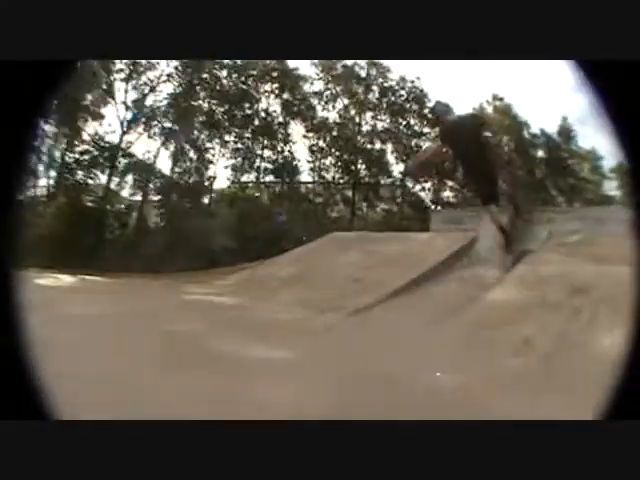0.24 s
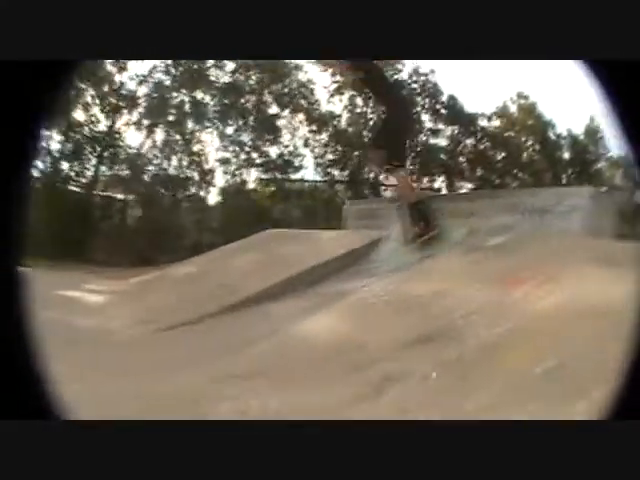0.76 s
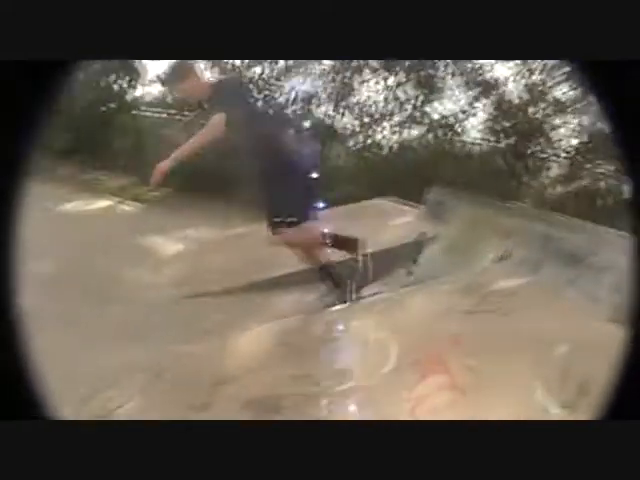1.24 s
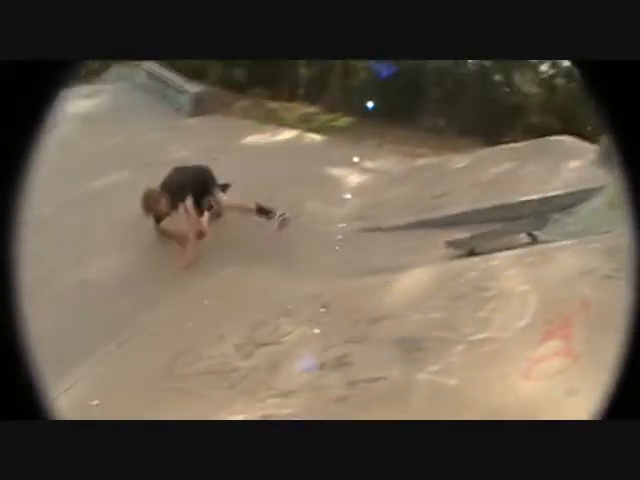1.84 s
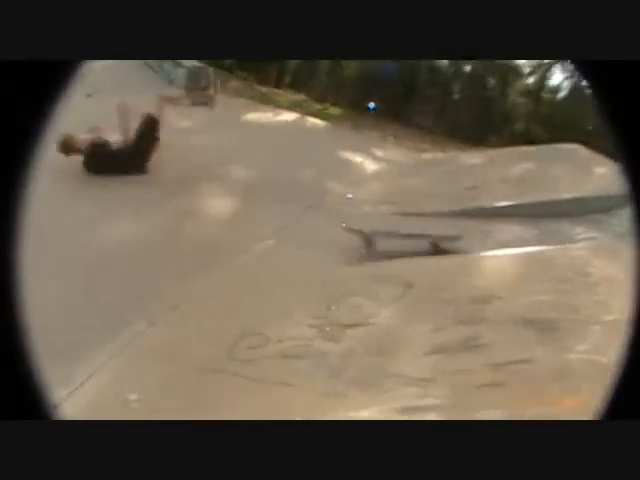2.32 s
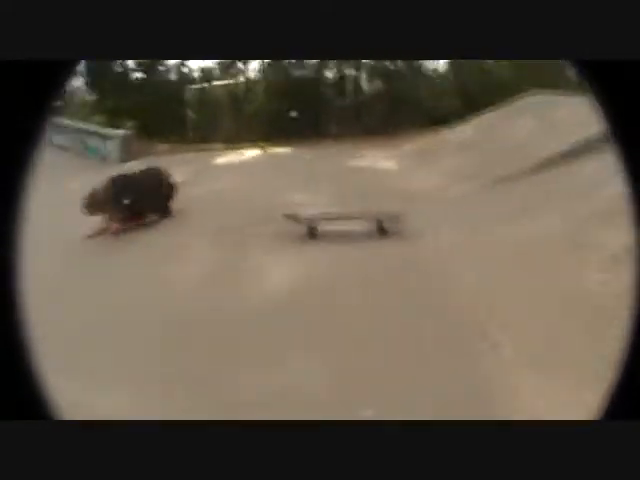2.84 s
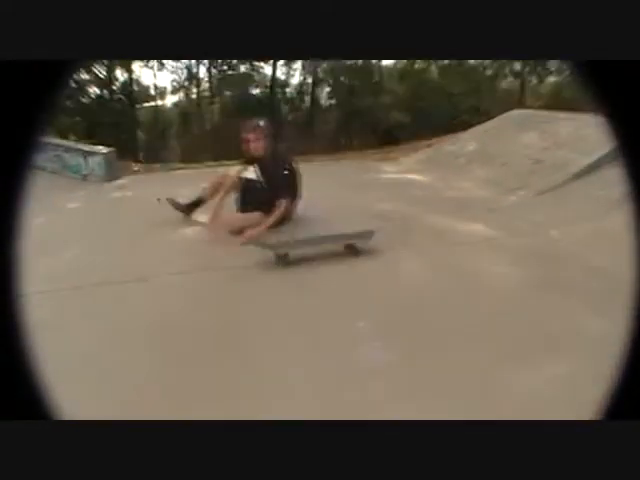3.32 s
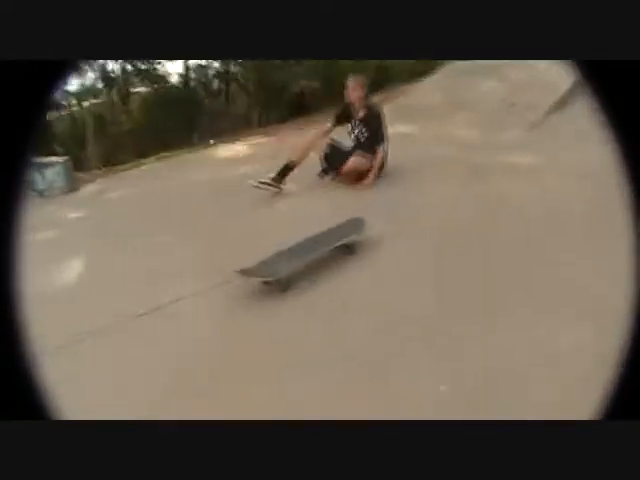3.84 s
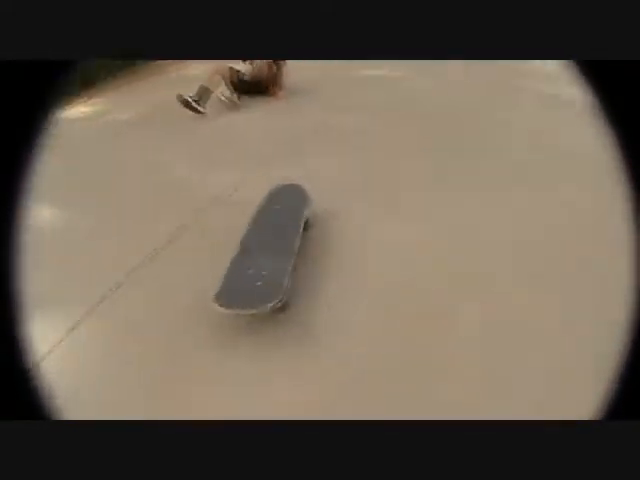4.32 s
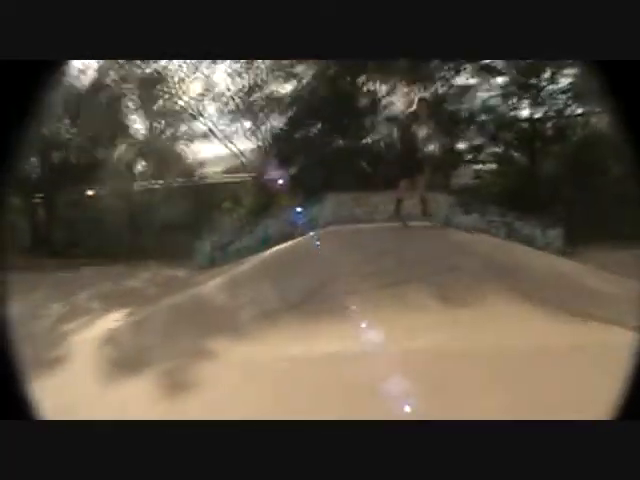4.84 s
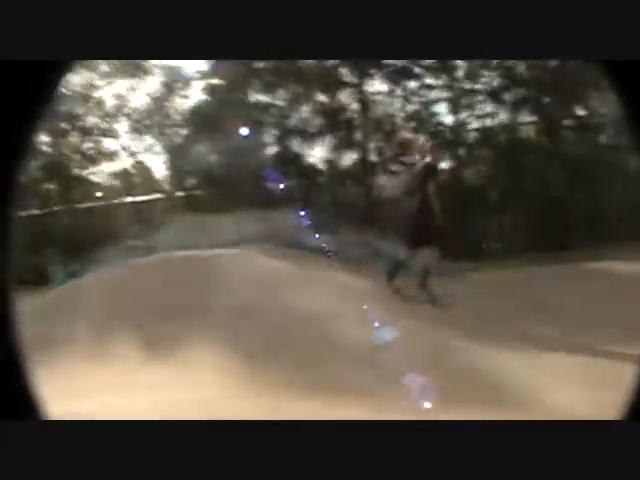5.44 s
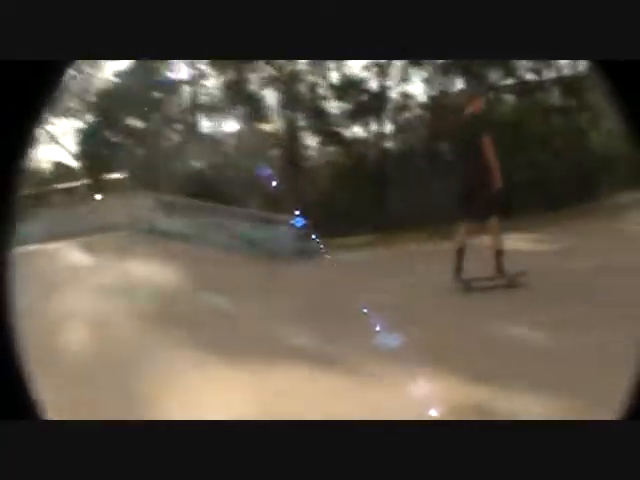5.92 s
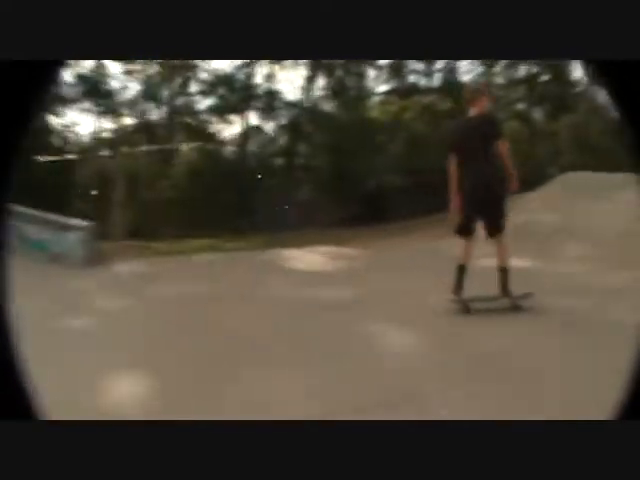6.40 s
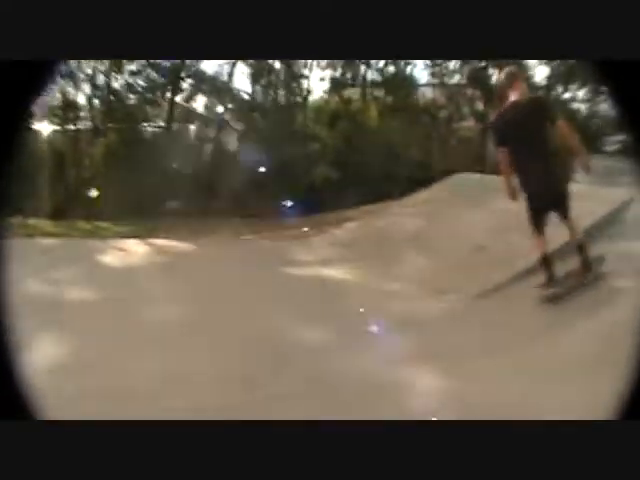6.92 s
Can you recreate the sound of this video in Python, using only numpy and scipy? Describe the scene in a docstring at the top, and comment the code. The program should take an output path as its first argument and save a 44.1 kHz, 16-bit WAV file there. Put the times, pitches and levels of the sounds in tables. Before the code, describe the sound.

A skateboard rolls up a concrete bank, pops and clatters in a bail, rolls close, and after a brief silence rides past again.

```python
"""Skateboard on a concrete bank

Heard from a moving stereo microphone close by, a skater rides up a bank, pops the board and bails.
It clatters down, lands on its wheels and rolls right up, empty. After a silent gap he rides past again,
over a slab joint. Rough concrete shakes the deck through the wheels and grit cracks under them.
Wind buffets the microphone, and its fast gain control ducks after every hard knock."""
import sys
import numpy as np
from scipy import signal
from scipy.fft import rfft, irfft
from scipy.io import wavfile
from scipy.ndimage import uniform_filter1d, map_coordinates

SR = 44100
rng = np.random.default_rng(int(sys.argv[2]) if len(sys.argv) > 2 else 0)


def materialize(psi):
    """Save the field psi as 16-bit PCM at rate SR to the path in sys.argv[1].

    A 1-D psi becomes a single channel; in a 2-D psi each row is a channel.
    """
    bounded = np.clip(np.atleast_2d(psi).T, -1, 1)
    quanta = np.round(bounded * 32767).astype(np.int16)
    wavfile.write(sys.argv[1], SR, quanta)


N = 315756
TIME = np.arange(N) / SR
AGE = TIME[TIME < .16]   # seconds since a blow
GAP_START_S, GAP_END_S = 4.652, 5.480


def from_db(db):
    """Decibels as an amplitude factor."""
    return np.exp(np.asarray(db) * np.log(10) / 20)


def rms_one(x):
    """Scale a steady sound to rms 1."""
    return x / np.sqrt(np.mean(x ** 2) + 1e-20)


def burst_one(x):
    """Scale a blow to the energy of a fiftieth of a second at rms 1."""
    return x / np.sqrt(np.sum(x ** 2, axis=-1, keepdims=True) * 50 / SR + 1e-20)


def in_time(rows):
    """Join (seconds, value) points into a curve."""
    return np.interp(TIME, *np.transpose(rows))


def between(from_s, to_s, edge_s):
    """1 inside a span of time, 0 outside, with soft edges."""
    return (np.tanh((TIME - from_s) / edge_s) - np.tanh((TIME - to_s) / edge_s)) / 2


def drift(hz):
    """A smooth random wander of spread 1."""
    step, settle = 40, 2000
    pole = np.exp(-2 * np.pi * step * hz / SR)
    noise = rng.standard_normal(N // step + settle + 2)
    slow = signal.lfilter([1], [1, -2 * pole, pole * pole], noise)[settle:]
    return np.interp(np.arange(N) / step, np.arange(len(slow)), rms_one(slow))


def colour(x, points, size=2048):
    """Causal (minimum-phase) filter that follows a (Hz, dB) table."""
    hz, db = np.transpose(points)
    grid = np.maximum(np.fft.rfftfreq(size, 1 / SR), 1)
    gain = from_db(np.interp(np.log(grid), np.log(hz), db))
    cepstrum = irfft(np.log(gain))
    cepstrum[1:size // 2] *= 2
    cepstrum[size // 2 + 1:] = 0
    impulse = irfft(np.exp(rfft(cepstrum)))
    return signal.oaconvolve(x, impulse[None], axes=-1)[:, :x.shape[-1]]


def resonate(x, hz, width_hz):
    """A resonance with gain 1 at its peak."""
    r = np.exp(-np.pi * width_hz / SR)
    feedback = [1, -2 * r * np.cos(2 * np.pi * hz / SR), r * r]
    return signal.lfilter(np.array([1, 0, -1]) * (1 - r * r) / 2, feedback, x)


def cut(x, hz, kind, order=2):
    """Butterworth high-pass or low-pass."""
    return signal.sosfilt(signal.butter(order, hz, kind, fs=SR, output="sos"), x)


def bend(x, percent):
    """Raise or lower the pitch of a steady sound from moment to moment."""
    position = np.cumsum(1 + percent / 100) % (N - 1)
    return np.array([map_coordinates(channel, [position], order=1) for channel in x])


def add(out, start_s, sound):
    """Mix a sound in from its start time."""
    at = max(round(start_s * SR), 0)
    out[:, at:at + sound.shape[-1]] += sound[..., :N - at]


def grain_kicks(per_s, spread_db):
    """Rolling over tiny bumps gives dense random kicks of uneven size."""
    met = rng.random((2, N)) < per_s / SR
    sizes = 1 + (from_db(spread_db) - 1) * rng.standard_exponential((2, N), dtype=np.float32)
    return met * sizes * rng.standard_normal((2, N), dtype=np.float32)


# The deck's drone over changing ground. Each row: time in seconds, pitch shift in per cent.
DECK_BEND = [(1.9, 0), (2.1, -2), (2.34, 2.5), (2.47, 2), (2.72, -7), (2.95, -1), (4.6, 1), (5.5, 0.5),
             (7.1, 0)]
def deck_rumble(modes, load_db):
    """Concrete shakes the deck; each resonance waxes and wanes as the load shifts between wheels."""
    kicks = grain_kicks(2500, spread_db=-0.5) * from_db(load_db)
    rumble = sum((-1) ** k * from_db(db + 1.2 * drift(hz=11)) * resonate(kicks, hz, width)
                 for k, (hz, width, db) in enumerate(modes))
    rumble = bend(rumble, percent=in_time(DECK_BEND) + 1.5 * drift(hz=4))
    return rms_one(cut(cut(rumble, 147.6, "high"), 1010, "low"))


def wheel_growl():
    """The wheel bodies answer the concrete with a low growl."""
    body = resonate(grain_kicks(4000, spread_db=-0.5), hz=238, width_hz=150)
    return rms_one(cut(cut(body, 180, "high", order=3), 520, "low"))


# Spectrum of the wheels' hiss. Each row: frequency in Hz, level in dB.
HISS = [(2350, -21), (4000, 0.5), (4930, -2), (8160, -1), (9380, -1.5), (12500, -11.5), (15100, -23),
        (16000, -18)]
# The bearings' steel rings. Each row: frequency in Hz, width in Hz, gain in dB relative to the hiss.
BEARING_RINGS = [(4900, 200, -8), (6100, 220, -9), (7400, 250, -5), (8400, 220, -7), (9500, 250, -6)]
def steely_hiss(kicks):
    """Fine kicks make a hiss; bearing resonances fade in and out of it as the balls shift."""
    hiss = colour(kicks, HISS)
    rings = sum(from_db(db + 5 * np.tanh(drift(hz=2.5))) * resonate(hiss, hz, width)
                for hz, width, db in BEARING_RINGS)
    return rms_one(hiss + rings)


# Wheel speed. Each row: time in seconds, turns per second.
WHEEL_TURNS = [(0, 30), (1, 22), (2.3, 30), (3.3, 21), (4.6, 19), (5.5, 30), (7.2, 27)]
def rolling(levels, deck_modes, rasp_spectrum, rumble_db, rumble_follows, hiss_db, hiss_follows,
            lumpy_db, growl_db):
    """Wheels rasp on concrete, with rumble, growl and hiss following; uneven wear throbs once a turn."""
    rasp_db = in_time(levels)
    effort_db = rasp_db + 25   # above an ordinary roll
    turns_per_s = in_time(WHEEL_TURNS) * (1 + 0.09 * drift(hz=4.2))
    throb = np.cos(2 * np.pi * np.cumsum(turns_per_s) / SR)
    load_db = lumpy_db * (0.27 * throb + 0.21 * drift(hz=35))
    rumble = deck_rumble(deck_modes, load_db)
    growl = from_db(growl_db) * wheel_growl()
    rasp = rms_one(colour(grain_kicks(9000, spread_db=-0.5) * from_db(0.68 * load_db), rasp_spectrum))
    hiss = steely_hiss(grain_kicks(25000, spread_db=3.5) * from_db(0.27 * load_db + drift(hz=60)))
    sound = (from_db(rumble_db + rumble_follows * effort_db) * rumble
             + from_db(rasp_db) * (rasp + growl)
             + from_db(hiss_db + hiss_follows * effort_db) * hiss)
    return sound * ((TIME >= levels[0][0]) & (TIME < levels[-1][0]))


# Wheel rasp at the microphone on each stretch. Each row: time in seconds, level in dB.
APPROACH_LEVELS = [(0, -18.5), (.29, -20), (.39, -23), (.56, -20.5)]
BANK_LEVELS = [(.57, -40.5), (.7, -25), (.83, -21), (.96, -15.5), (1.07, -31), (1.42, -33), (1.7, -42)]
EMPTY_LEVELS = [(1.86, -57), (1.96, -38.5), (2.05, -32), (2.3, -27), (2.55, -24.5), (2.71, -26),
                (2.76, -26), (2.84, -18), (2.97, -28), (3.18, -29), (3.3, -24.5), (4.12, -22), (4.29, -21),
                (4.52, -14), (4.66, -22)]
RIDE_BY_LEVELS = [(5.47, -25), (5.62, -23.5), (5.76, -26), (6.0, -29), (6.12, -31.5), (6.27, -34),
                  (6.57, -25.5), (6.9, -21.5), (7.17, -26)]
# Resonances of the rolling deck. Each row: frequency in Hz, width in Hz, gain in dB.
DECK_RUN_UP = [(148.3, 110, -17), (248.5, 91, -12), (413, 40, 2), (493, 58, 2.5), (610, 120, 1),
               (745, 200, -8.5)]
DECK_EMPTY = [(336, 83, -7), (481, 100, -1.5), (557, 47, 3), (627, 54, 3.5), (703, 76, -3)]
DECK_RIDE_BY = [(248, 170, -14), (419, 72, -3.5), (494, 62, 0.5), (570.4, 70, 1), (651, 88, -1)]
# Spectra of the rasp. Each row: frequency in Hz, level in dB.
RASP_RUN_UP = [(440, -29), (750, 1.5), (827, 4.5), (961, 0.5), (1360, 1.5), (1540, -3.5), (2030, -10),
               (2620, -7), (3280, -10), (3900, -17), (4500, -23), (5850, -52), (9900, -120)]
RASP_EMPTY = [(440, -36.5), (750, -3), (814, -0.5), (925, -6), (1040, 1), (1250, 0), (1350, -2.5),
              (1480, 0), (1640, -5), (2090, -8.5), (2290, -9), (2960, -10), (3380, -11), (3900, -16.5),
              (4500, -27.5), (5850, -64), (9900, -120)]
RASP_RIDE_BY = [(500, -36), (850, -6), (905, -9), (1010, -1.5), (1360, -2), (1590, -9), (1770, -7),
                (2090, -14), (2520, -6.5), (2820, -13.5), (3400, -13), (3810, -20), (4500, -20.5),
                (5850, -22.5), (9900, -120)]
def wheels():
    """The board rolls to the bank, up it, back empty towards the microphone, then past with its rider."""
    approach = rolling(APPROACH_LEVELS, DECK_RUN_UP, RASP_RUN_UP, rumble_db=-25, rumble_follows=0.48,
                       hiss_db=-42.5, hiss_follows=1.7, lumpy_db=-5, growl_db=-15.5)
    bank = rolling(BANK_LEVELS, DECK_RUN_UP, RASP_RUN_UP, rumble_db=-21.5, rumble_follows=1,
                   hiss_db=-35.5, hiss_follows=.9, lumpy_db=4, growl_db=-14.5)
    coarse = between(2.09, 2.78, edge_s=0.07)   # a coarser slab shakes the empty board harder
    empty = rolling(EMPTY_LEVELS, DECK_EMPTY, RASP_EMPTY, rumble_db=9 * coarse - 26, rumble_follows=0.77,
                    hiss_db=-33.5, hiss_follows=0.66,
                    lumpy_db=2.5 * coarse - 0.5, growl_db=7 * coarse - 13.5)
    ride_by = rolling(RIDE_BY_LEVELS, DECK_RIDE_BY, RASP_RIDE_BY,
                      rumble_db=in_time([(5.9, -22), (6.6, -19.5)]), rumble_follows=0.51,
                      hiss_db=-34, hiss_follows=1.06, lumpy_db=2, growl_db=-21.5)
    return approach + bank + empty + ride_by


# Gusts right on the microphone as it is swung along. Each row: peak time in seconds,
# half length in seconds, buffeting in dB, flutter in dB relative to the buffeting.
GUSTS = [(.14, 0.27, -31.5, 0.5), (.52, 0.044, -31.5, 13), (.74, 0.15, -31, 7.5), (0.912, 0.09, -24, 7),
         (1.835, 0.034, -31.5, -2), (2.527, 0.43, -30.5, -5), (3.549, 0.428, -27, -8.5),
         (5.83, 0.31, -24, 5), (6.606, 0.11, -39, -5)]
# Spectra of the low buffeting and the brighter flutter. Each row: frequency in Hz, level in dB.
BUFFET = [(20, -29.5), (50, -10), (100, 1), (170, 9.5), (280, 7), (420, -9.5), (800, -38), (2000, -68)]
FLUTTER = [(150, -25), (330, 7.5), (480, 4.5), (800, -1.5), (1300, -14), (2200, -21), (4000, -47.5)]
def wind():
    """Gusts swell and die away as lumpy turbulence, mostly opposite at the two microphone ports."""
    calm_buffet_db, calm_flutter_db = -50.5, -51
    peak_s, half_s, gust_db, flutter_db = np.transpose(GUSTS)[:, :, None]
    swells = from_db(gust_db) * np.exp(-((TIME - peak_s) / half_s) ** 2)
    buffet_gain = from_db(calm_buffet_db) + swells.sum(axis=0)
    flutter_gain = from_db(calm_flutter_db) + (from_db(flutter_db) * swells).sum(axis=0)
    eddies_db = 1.1 * drift(hz=22)
    buffet = rms_one(colour(rng.standard_normal((2, N)) * from_db(eddies_db), BUFFET))
    fast_eddies = rng.standard_normal((2, N)) * from_db(0.35 * eddies_db + 1.2 * drift(hz=50))
    flutter = rms_one(colour(fast_eddies, FLUTTER))
    common, opposite = buffet_gain * buffet + flutter_gain * flutter
    return from_db(-11.5) * common + opposite * [[1], [-1]]


def crunch(decay_s, tail_db, tail_s, bite_s=0.00225):
    """Contact noise: a burst that builds as the surfaces bite, and a weak scattered tail."""
    bite = 1 - np.exp(-AGE / bite_s)
    decay = np.exp(-AGE / decay_s) + from_db(tail_db) * np.exp(-AGE / tail_s)
    return rng.standard_normal((2, len(AGE))) * bite * decay


def dying_tone(hz, decay_s):
    """One struck resonance that swells in about a millisecond and dies."""
    tone = np.sin(2 * np.pi * (hz * AGE + rng.random((2, 1))))
    return burst_one(tone * (1 - np.exp(-AGE / .001)) * np.exp(-AGE / decay_s))


# The board striking concrete; its pitch depends on the spot that hits. Two rows are the skater's shoes instead:
# a faint scuff at 1.508 s and the slap of a foot at 1.52 s. # Each row: start in seconds, deck level in dB,
# trucks level in dB, deck pitch in Hz, trucks pitch in Hz, # low-pass in Hz, first hard tick in dB relative to
# the trucks.
CLACKS = [(0.3228, -16.5, -19, 1040, 1375, 10920, -13), (0.5541, -27.5, -13.5, 790, 1630, 10500, -3),
          (1.4309, -20.5, -12.5, 490, 1670, 6900, -7.5), (1.508, -33, -35.5, 810, 2100, 7000, -11.5),
          (1.52, -13, -7.5, 470, 1114, 5500, -13.5), (1.608, -25, -18.5, 920, 1680, 5970, -14),
          (1.673, -28.5, -38, 890, 1610, 8000, -11), (1.6844, -35.5, -25, 854, 1540, 9000, -8.5),
          (1.702, -32, -30, 537, 1640, 10000, -4.5), (1.7165, -48.5, -25, 545, 1970, 9040, -10),
          (1.753, -35, -38, 780, 1570, 10000, -2), (1.8345, -15.5, -20.5, 789, 1180, 12900, -12.5),
          (1.863, -34.5, -27, 805, 1780, 10000, -11), (1.961, -29, -42, 756, 1510, 9050, -11),
          (2.011, -25.5, -20.5, 810, 1570, 11150, -8), (2.0183, -18.5, -30.5, 756, 1870, 6250, -13)]
# Modes of the struck board. Each row: frequency in Hz, level in dB, seconds to fall 60 dB.
BOARD_MODES = [(587, -4.5, .035), (770, -0.5, 0.037), (843, -16, 0.06), (1154, -1.5, 0.065), (1590, 3, .03),
               (1950, -5, 0.038), (2130, -1.5, 0.034), (2600, -14.5, 0.078), (2740, -1, .03),
               (3450, -12, 0.029), (4190, -11, .05)]
# Spectra of a woody slap and a bright snap. Each row: frequency in Hz, level in dB.
SLAP = [(150, -27), (500, -11.5), (1000, 12.5), (1700, 1), (3200, -5.5), (5000, -11), (9000, -22)]
SNAP = [(800, -10), (2500, 5), (4500, 0), (7000, 1), (9500, -0.5), (12000, -7.5), (16000, -25.5)]
def clacks():
    """The wooden deck knocks, snaps and rings low; the metal trucks tick, slap, clank and ring high."""
    out = np.zeros((2, N))
    hz, mode_db, t60 = np.transpose(BOARD_MODES)[:, :, None]
    for start_s, deck_db, truck_db, deck_hz, truck_hz, top_hz, tick_db in CLACKS:
        strike_point_db = rng.normal(0, 2.5, hz.shape)
        drive_db = np.interp(hz, [850, 1400], [deck_db, truck_db - 6.5])
        modes = np.sin(2 * np.pi * (hz * AGE + rng.random((2, len(hz), 1))))
        ring = np.sum(from_db(mode_db + strike_point_db + drive_db - 60 * AGE / t60) * modes, axis=1)
        slap = burst_one(colour(crunch(.0078, tail_db=-28, tail_s=.014), SLAP))
        snap = burst_one(colour(crunch(.003, tail_db=-14, tail_s=.014), SNAP))
        tick = burst_one(colour(crunch(.0007, tail_db=-40, tail_s=.004, bite_s=.0001), SNAP))
        knock = dying_tone(deck_hz, decay_s=.0068)
        clank = dying_tone(truck_hz, decay_s=.003)
        deck = from_db(-2) * knock + from_db(-3) * snap
        trucks = from_db(-8.5) * clank + from_db(-12.5) * slap + from_db(tick_db) * tick
        blow = ring + from_db(deck_db) * deck + from_db(truck_db) * trucks
        add(out, start_s, cut(cut(blow, 298.4, "high"), top_hz, "low"))
    return out


def thump(hz, ring_s, flex_db, click_db):
    """Soft urethane meets an edge: a knock of a few cycles, a lower flex of the deck, a woody click."""
    envelope = (1 - np.exp(-AGE / .0006)) * np.exp(-(AGE / ring_s) ** 2)
    knock = sum(from_db(db) * np.sin(2 * np.pi * (hz * ratio * AGE + rng.random((2, 1))))
                for ratio, db in [(.6, flex_db), (1, 1.5), (1.5, -7.5), (2, -11)])
    click = burst_one(colour(crunch(.003, tail_db=-19.5, tail_s=.012, bite_s=.0005), SLAP))
    return cut(envelope * knock, 260, "high", order=4) + from_db(click_db) * cut(click, 7000, "low")


# Axles crossing edges and slab joints, the front about 0.1 s before the rear. Each row: start in
# seconds, level in dB, pitch in Hz, ring in seconds, second wheel's lag in seconds, then the
# relative levels in dB of the second wheel, the deck's flex and the click.
JOINTS = [(0.7507, -3, 564, 0.0059, 0.0035, -10, -14, -14),
          (0.8364, 3.5, 686, 0.0086, 0.0039, -21, -19, -16), (.944, -6, 437, .007, .004, -12, -11, -22),
          (1.087, -8.5, 550, .007, 0.0037, -12, -16, -11.5),
          (2.478, -4.5, 592, 0.0066, 0.002, -14.5, -6, -18),
          (2.7248, -4.5, 527, 0.01, .003, -17, -10.5, -14.5),
          (2.8118, 0.5, 596, 0.0098, 0.0026, -20, -7, -14), (4.5, -6.5, 456, 0.0069, .003, -8.5, -4.5, -10),
          (4.616, -7, 482, 0.0068, 0.0029, -11.5, -7, -11.5),
          (6.072, -7.5, 520, 0.0075, 0.0074, 1, -13.5, -22),
          (6.1709, -11.5, 525, 0.0061, 0.0066, 2, -6, -25), (6.805, -11, 800, .009, .003, -16, -15, -24),
          (6.897, -10, 574, 0.0084, 0.0039, -12, -14, -30)]
# Pits in the concrete. Each row: start in seconds, level in dB, pitch in Hz.
PITS = [(1.331, -24, 640), (2.258, -16, 595), (2.335, -11.5, 570), (2.403, -19.5, 630), (2.436, -13, 659),
        (2.538, -9, 593), (7.14, -15.5, 538)]
def joints_and_pits():
    """Each axle meets a joint with one wheel just ahead of the other; pits jolt one wheel alone."""
    out = np.zeros((2, N))
    for start_s, db, hz, ring_s, lag_s, second_db, flex_db, click_db in JOINTS:
        add(out, start_s, from_db(db) * thump(hz, ring_s, flex_db, click_db))
        add(out, start_s + lag_s, from_db(db + second_db) * thump(hz, ring_s, flex_db, click_db))
    for start_s, db, hz in PITS:
        add(out, start_s, from_db(db) * thump(hz, ring_s=.0075, flex_db=-7.5, click_db=-22.5))
    return out


# Loose grit on the concrete. Each row: start in seconds, level in dB, pitch of the snap in Hz,
# decay in seconds, jolt of the deck in dB relative to the snap.
GRIT_CRACKS = [(.775, -27.5, 8500, 0.003, 7.5), (1.044, -23, 6100, 0.0046, -2),
               (1.071, -34, 6000, 0.0047, 1), (2.0959, -32, 6500, 0.0059, -3),
               (2.357, -32.5, 4000, 0.0043, 9), (2.378, -30.5, 6000, 0.0043, 0.5),
               (2.5107, -31.5, 6500, .002, -2), (2.577, -23, 6600, 0.013, 4),
               (3.131, -29, 10570, 0.0021, -2.5), (5.621, -25.5, 5400, 0.0029, 1),
               (5.692, -33, 5360, .004, 3.5), (5.813, -43, 4800, 0.0046, 14),
               (6.8048, -26, 5400, 0.0061, 0)]
def grit_cracks():
    """A grain of grit is crushed or spat out from under a wheel, and gives the deck a small jolt."""
    out = np.zeros((2, N))
    for start_s, db, hz, decay_s, jolt_db in GRIT_CRACKS:
        burst = crunch(decay_s, tail_db=-20, tail_s=.01, bite_s=.0002)
        snap = burst_one(resonate(colour(burst, SNAP), hz, width_hz=3400))
        jolt = burst_one(resonate(burst, hz=1500, width_hz=1400))
        add(out, start_s, from_db(db) * (snap + from_db(jolt_db) * jolt))
    return out


def free_spin():
    """While the board tumbles, its wheels only hiss and whirr in their bearings."""
    hiss = steely_hiss(grain_kicks(18000, spread_db=17))
    whirr = rms_one(colour(grain_kicks(5500, spread_db=18), RASP_EMPTY))
    return between(1.47, 1.926, edge_s=.075) * (from_db(-40.5) * hiss + from_db(-42.5) * whirr)


# Dull low pushes: the skater coming down on the concrete, then a faint one as a gust pops on the microphone.
# Each row: start in seconds, level in dB.
LOW_PUSHES = [(1.521, -13), (1.812, -35)]
def low_pushes():
    """A dull, low push: shoes and body landing, or a gust popping on the microphone."""
    out = np.zeros((2, N))
    tones = sum(from_db(db) * np.sin(2 * np.pi * hz * AGE) for hz, db in [(240, 8.7), (440, 0.5)])
    envelope = (1 - np.exp(-AGE / .0022)) * np.exp(-AGE / .0054)
    push = cut(tones * envelope, 134, "high") * from_db([[0], [-3]])   # weaker in the side channel
    for start_s, db in LOW_PUSHES:
        add(out, start_s, from_db(db) * push)
    return out


# Wheel resonances that stand out at close range. Each row: frequency in Hz, width in Hz, gain in dB.
WHEEL_MODES = [(815, 62, -6), (1099, 110, -6), (1280, 140, -2.5), (1483, 120, 1.5), (1790, 240, -5),
               (2260, 320, -9)]
# Their growl as the empty board closes in. Each row: time in seconds, level in dB.
CLOSING_IN = [(2.9, -48), (3.16, -33), (3.3, -22), (3.7, -25.5), (4.1, -25), (4.29, -19), (4.55, -14),
              (4.66, -23)]
def close_wheels():
    """The empty board arrives at the microphone, its hard wheels ringing on the concrete."""
    kicks = grain_kicks(5000, spread_db=2)
    growl = sum((-1) ** k * from_db(db) * resonate(kicks, hz, width)
                for k, (hz, width, db) in enumerate(WHEEL_MODES))
    return from_db(in_time(CLOSING_IN)) * (TIME < GAP_START_S) * rms_one(cut(growl, 3000, "low"))


# Echoes off nearby ramps and ledges. Each row: delay in seconds, level in dB.
RAMP_ECHOES = [(0.015, -20), (0.029, -20), (0.054, -31), (.084, -22)]
def with_echoes(direct):
    """The surrounding concrete returns a few dull copies of the sound."""
    dull = cut(direct, 3980, "low", order=1)
    heard = direct.copy()
    for delay_s, db in RAMP_ECHOES:
        add(heard, delay_s, from_db(db) * dull)
    return heard


# The microphone's stereo width. Each row: frequency in Hz, gain of the side channel in dB.
STEREO_WIDTH = [(30, 0.5), (90, 8.5), (170, -6.5), (290, -12.5), (480, -15), (800, -13.5), (1400, -15),
                (3500, -29.5), (7000, -18), (10000, -6.5), (16000, -14.5)]
def stereo_microphone(mid_side, right_lean_db=0.53):
    """Mid and side become left and right, leaning slightly to the right."""
    side = colour(mid_side[1:], STEREO_WIDTH)
    sign = np.array([[1], [-1]])
    return (mid_side[0] + side * sign) * from_db(-sign * right_lean_db / 2)


def scene():
    """Board and skater, carried as mid and side, echo off the ramps; wind blows on the microphone."""
    direct = (wheels() + close_wheels() + free_spin() + joints_and_pits()
              + clacks() + grit_cracks() + low_pushes())
    return stereo_microphone(with_echoes(direct)) + wind()


def gain_control(x, threshold_db, attack_s, release_db_per_s):
    """Loud knocks pull the gain down within milliseconds; it creeps back at a steady rate."""
    power = uniform_filter1d(np.mean(x, axis=0) ** 2, size=128)
    over_db = np.maximum(10 * np.log10(np.maximum(power, 1e-12)) - threshold_db, 0)
    release_db = release_db_per_s * TIME
    held_db = np.maximum.accumulate(over_db + release_db) - release_db
    pole = np.exp(-1 / (attack_s * SR))
    return x * from_db(-signal.lfilter([1 - pole], [1, -pole], held_db))


def record(dry):
    """Gain control, rounded peaks, a silent gap between the rides and a steep cut above 16 kHz."""
    held = gain_control(dry, threshold_db=-15, attack_s=.004, release_db_per_s=100)
    rounded = held / (1 + held ** 6) ** (1 / 6)
    running = (TIME < GAP_START_S) | (TIME > GAP_END_S)
    low_pass = signal.ellip(10, .1, 80, 16000, fs=SR, output="sos")
    return signal.sosfilt(low_pass, rounded * running)


dry = scene()
out = record(dry)
materialize(out)
```